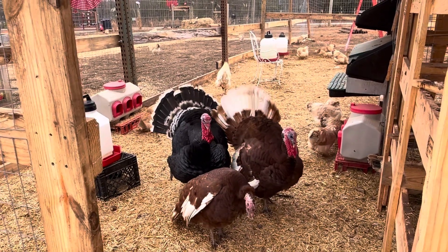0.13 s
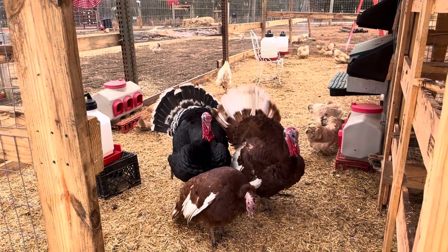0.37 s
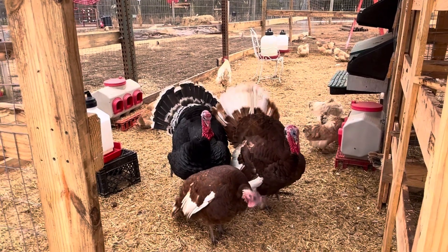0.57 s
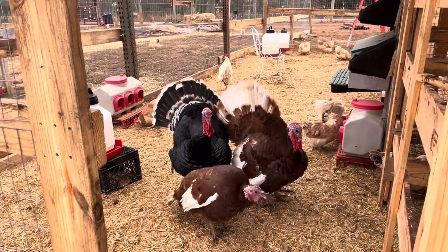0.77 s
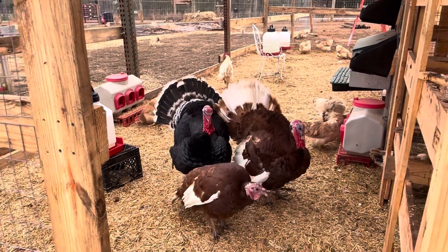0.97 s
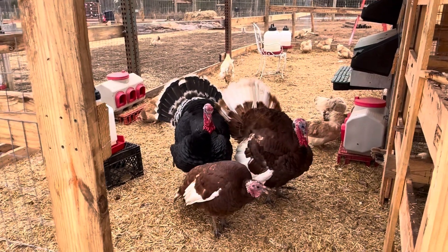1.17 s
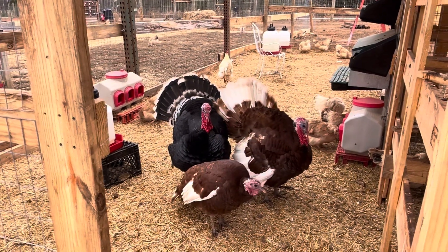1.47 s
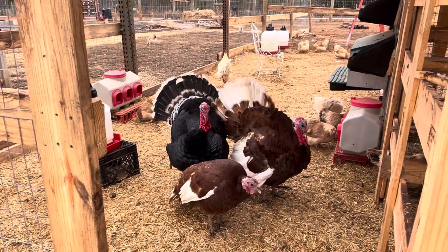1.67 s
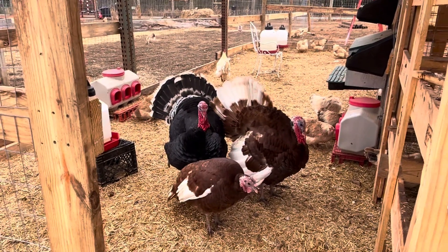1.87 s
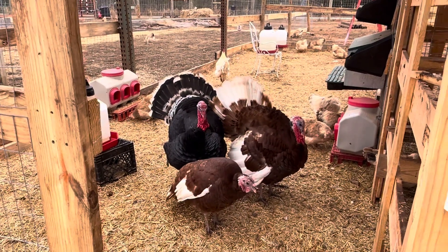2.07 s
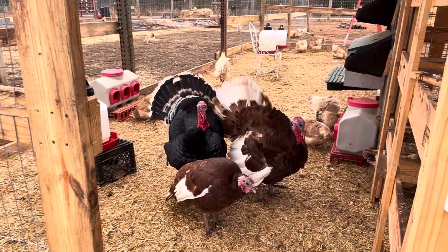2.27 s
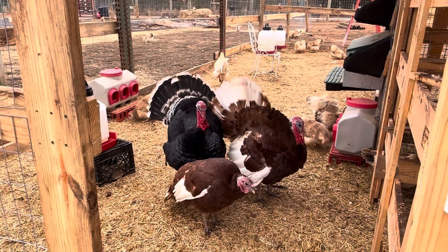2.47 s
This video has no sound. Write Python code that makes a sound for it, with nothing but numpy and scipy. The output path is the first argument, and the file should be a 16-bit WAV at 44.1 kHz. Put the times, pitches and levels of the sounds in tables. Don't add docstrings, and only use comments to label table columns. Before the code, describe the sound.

Turkeys shake their plumage a few metres away: muffled wing thuds, clacking quills and dry feather swishes build, peak near the middle, then ease as feet shuffle in litter; low wind rumble, outdoor pen, handheld stereo microphone.

```python
import sys
import numpy as np
from scipy import signal
from scipy.fft import rfft, irfft
from scipy.io import wavfile
from scipy.ndimage import uniform_filter1d

SR = 44100
rng = np.random.default_rng(int(sys.argv[2]) if len(sys.argv) > 2 else 0)


def store_pcm(level_fs):
    pcm = np.round(np.clip(level_fs, -1, 1) * 32767).astype(np.int16)
    wavfile.write(sys.argv[1], SR, np.atleast_2d(pcm).T)


def gain_from_db(level_db):
    decades = np.asarray(level_db, float) / 20
    return 10 ** decades


N = 115101

# start_s, level_db, upper_mode_share_0_1, ring_length_factor
WING_BEATS = [(0.107, -55.5, 0.8, 0.73), (0.27, -61, 0.4, 1.3), (0.321, -43.5, 0.1, 0.55),
              (0.565, -46.5, 0.34, 1), (0.644, -41, 0.39, 0.83), (0.699, -52, 0.54, 0.77),
              (0.776, -36.5, 0.47, 1), (0.862, -41, 0.1, 0.76), (0.869, -50.5, 1, 1.03),
              (0.943, -45, 0.4, 1.4), (0.957, -39.5, 0.63, 0.39), (0.987, -39, 0.3, 0.64),
              (1.054, -36, 0.13, 0.9), (1.167, -33.5, 0.59, 0.82), (1.279, -37, 0.03, 0.86),
              (1.344, -44.5, 1, 1.14), (1.385, -40.5, 0.34, 1.42), (1.487, -37, 0.37, 0.64),
              (1.598, -42.5, 0.85, 1.17), (1.708, -43.5, 0.49, 0.97), (1.775, -44, 0.3, 1),
              (1.808, -44, 0.97, 0.22), (2.027, -44.5, 0.4, 1.03), (2.129, -38, 0.53, 0.71),
              (2.298, -46, 0.3, 0.63), (2.335, -43, 0.38, 0.63), (2.405, -50.5, 0, 0.65)]
# pitch_hz, t60_s, level_db, upper_family_0_1
BODY_MODES = [(204, 0.064, -1, 0), (269.2, 0.047, 0.5, 0.25), (127.6, 0.2, -12, 0.4),
              (319.6, 0.064, 2.5, 1), (440, 0.037, -8.5, 0.85)]


def wing_beats():
    beat_db, after_db, wide_db, after_s = -2, -8, -26, 0.031
    t = np.arange(8192) / SR
    out = np.zeros((2, N + len(t)))
    for start_s, level_db, share, length in WING_BEATS:
        rag = rng.standard_normal((2, len(t))) * np.exp(-t / after_s) / np.sqrt(after_s * SR)
        push = rag * gain_from_db([[after_db], [wide_db]])
        push[0, 0] = 1
        body = 0
        for k, (hz, t60_s, mode_db, upper) in enumerate(BODY_MODES):
            u = t * np.log(1000) / (t60_s * max(length, 0.3))
            swell = np.e * u * np.exp(-u)
            weight = upper * share + (1 - upper) * (1 - share)
            sign = (-1) ** k
            body = body + sign * gain_from_db(mode_db) * weight * swell * np.sin(2 * np.pi * hz * t)
        i = int(start_s * SR)
        thud = signal.fftconvolve(push, body[None])[:, :len(t)]
        out[:, i:i + len(t)] += gain_from_db(level_db + beat_db) * thud
    return left_late(spread(out[0, :N], out[1, :N], -3.5))


# peak_s, level_db, length_s, brightness_db
KNOCKS = [(0.112, -66, 0.03, -17), (0.578, -56, 0.057, -15), (0.652, -60.5, 0.057, -9),
          (0.796, -64.5, 0.03, 3.5), (0.879, -53, 0.071, -20), (1.016, -53, 0.055, -12.5),
          (1.081, -53.5, 0.029, -26), (1.182, -52, 0.058, -29), (1.353, -60, 0.13, -7.5),
          (1.491, -55, 0.021, -13), (1.566, -54.5, 0.019, -51), (1.79, -59.5, 0.15, -3),
          (1.91, -61.5, 0.16, -3.5), (2.024, -53.5, 0.033, -16), (2.11, -58, 0.083, -34),
          (2.168, -56, 0.067, -16), (2.278, -62, 0.026, -11), (2.386, -62, 0.2, -19),
          (2.474, -60, 0.058, -27), (2.6, -57, 0.029, -22)]
# pitch_hz, width_hz, level_db
QUILL_MODES = [(620, 270, 2.5), (922, 130, -3.5), (1120, 120, -9)]


def quill_knocks():
    k = np.array(KNOCKS)
    low_level = swells(KNOCKS, k[:, 1] - 6, 0.53)
    top_level = swells(KNOCKS, k[:, 1] + k[:, 3] - 3, 0.73)

    def clatter():
        x = rng.standard_normal(N)
        low = sum(gain_from_db(db) * np.sqrt(width) * ring(x, hz, 2.2 / width) for hz, width, db in QUILL_MODES)
        top = ring(x, 1560, 0.001)
        return low_level * low / low.std() + top_level * top / top.std()

    return spread(clatter(), clatter() * gain_from_db(0.5), -4.0)


# peak_s, level_db, pitch_hz, length_s
TWANGS = [(0.115, -60, 600, 0.018), (2.135, -46, 260, 0.018), (0.555, -63.5, 920, 0.043),
          (0.795, -63, 1690, 0.022), (0.866, -62.5, 954, 0.034), (0.87, -70, 1180, 0.023),
          (0.884, -58, 770, 0.035), (0.978, -59, 878, 0.012), (1.01, -59, 620, 0.016),
          (1.162, -56, 937, 0.017), (1.178, -63, 1450, 0.024), (1.186, -63, 950, 0.013),
          (1.205, -57, 602, 0.025), (1.232, -62.5, 1194, .013), (1.345, -56.5, 1188, 0.018),
          (1.346, -56, 870, .02), (1.356, -58, 1004, 0.04), (1.378, -52, 339.3, 0.037),
          (1.394, -62, 920, .025), (1.412, -46.5, 135, 0.056), (1.425, -61, 1000, 0.036),
          (1.471, -49.5, 315.4, 0.036), (1.476, -62, 880, 0.02), (1.565, -55.5, 1220, 0.017),
          (1.566, -58, 939, 0.022), (1.632, -50.5, 200, 0.026), (1.737, -63, 1270, .02),
          (1.801, -58, 912, 0.029), (1.808, -50.5, 460, 0.017), (1.835, -63, 829, 0.019),
          (1.884, -70, 2150, 0.057), (2.025, -61, 1236, .02), (2.084, -57, 1007, 0.029),
          (2.132, -59, 1093, 0.019), (2.179, -60, 950, 0.045), (2.18, -59, 2500, .007),
          (2.185, -56.5, 3400, .013), (2.183, -57, 1890, 0.016), (2.19, -63, 5370, 0.01),
          (2.215, -62, 3400, 0.016), (2.222, -65, 4480, 0.0072), (2.182, -60, 3930, .005),
          (2.184, -60, 6800, .0012), (0.498, -60, 11000, .0008), (1.742, -44.5, 100, .04),
          (2.038, -44, 99.7, 0.026), (2.268, -47.5, 69.9, .05), (1.236, -57, 190, 0.036),
          (1.453, -55, 453.6, 0.018), (0.465, -59.5, 299.4, 0.051)]


def short_twangs():
    t, out = np.arange(N) / SR, 0
    waver_s = t + np.cumsum(0.0118 * walk(90.0)) / SR
    for peak_s, level_db, hz, length_s in TWANGS:
        bell = np.exp(-4 * ((t - peak_s) / length_s) ** 2)
        out = out + gain_from_db(level_db) * bell * np.sin(2 * np.pi * (hz * waver_s + rng.random()))
    return left_late(spread(out, 0, -3.5))


# peak_s, level_db, length_s, brightness_db
SWISHES = [(0.01, -70, 0.018, -20), (0.131, -57, 0.029, -6.5), (0.332, -62.5, 0.054, -8),
           (0.435, -70, 0.018, -3), (0.51, -62.5, 0.082, -12), (0.796, -51.5, 0.037, -15),
           (0.975, -53.5, 0.038, -6.5), (1.087, -53.5, 0.032, -12), (1.297, -53, 0.059, -12),
           (1.43, -51, 0.051, -18), (1.508, -60.5, 0.026, -15), (1.633, -52, 0.037, -11),
           (1.724, -58.5, 0.054, -14.5), (1.804, -60, 0.048, -12.5), (1.937, -58, 0.061, -16),
           (2.045, -62, 0.027, -13), (2.18, -58, 0.18, -26), (2.285, -57.5, 0.031, -12),
           (2.398, -59.5, 0.059, -26), (2.534, -79.5, 0.067, 8),
           (0.084, -78, 0.028, 9),
    (0.67, -59.5, 0.11, -16),
    (0.724, -64.5, 0.077, -6.5),
    (1.175, -63, 0.063, -14),
    (1.405, -64, .03, -5),
    (2.153, -57.5, 0.036, -11),
]
# time_s, level_db, brightness_db
RUSTLE = [
    (0.0, -86, -14),
    (0.25, -77, -10),
    (1.21, -69.5, -10),
    (2.61, -81, -3),
]
# freq_hz, level_db_per_hz
VANES_MID = [(900, -3), (1800, -5.5), (2900, -3.5), (3400, -1.5), (4200, -4.5), (5200, -2), (7000, -6)]
# freq_hz, level_db_per_hz
VANES_SIDE = [(900, 19), (1800, 9), (2800, 10), (4300, 6.5), (5600, 12), (7000, 5)]
# freq_hz, level_db_per_hz
VANES_TOP = [(6000, -27.5), (8000, -6.5), (11000, -4.5), (14000, -2.5), (16000, -10)]


def feather_swishes():
    s = np.array(SWISHES)
    flicker = gain_from_db(1.5 * walk(31.64))
    rustle_db, rustle_bright_db = curve(RUSTLE), curve(RUSTLE, 2)
    tail = 1.45
    low_level = np.hypot(swells(s, s[:, 1] - 12.5, tail), gain_from_db(rustle_db))
    top_level = np.hypot(swells(s, s[:, 1] + s[:, 3] - 5.5, tail), gain_from_db(rustle_db + rustle_bright_db))

    def swish(shape):
        x = crackle()
        return flicker * (low_level * colour(x, shape) + top_level * colour(x, VANES_TOP))

    return spread(swish(VANES_MID), gain_from_db(1.0) * swish(VANES_SIDE), 0.23)


# start_s, level_db, rattle_s, centre_hz, spread_octaves
PECKS = [
    (0.113, -55, 0.033, 3740, 0.22),
    (0.88, -66, 0.008, 3420, .08),
    (1.632, -64, 0.004, 4200, 0.3),
    (2.179, -54.5, 0.0023, 3070, 0.47),
    (2.182, -54, 0.015, 5260, 0.64),
    (2.212, -55, 0.0067, 3780, 0.25),
    (2.383, -62, 0.0025, 5760, 0.76),
    (2.523, -66.5, 0.0045, 6000, .3),
]
# pitch_hz, level_db
PECKED_MODES = [(1900, -2), (2500, -3), (3050, -3), (3390, 0), (3940, -3), (4500, -5), (5370, -3),
                (5890, -6), (6340, -7)]


def pecks():
    strike_s, mode_t60_s, off_centre_db, crack_db = 0.002, 0.038, 6, 14
    t = np.arange(6000) / SR
    out = np.zeros((2, N + len(t)))
    for start_s, level_db, rattle_s, centre_hz, octaves in PECKS:
        envelope = np.sqrt(3 * t / rattle_s) * np.exp(-t / rattle_s) / np.sqrt(rattle_s * SR)
        x = rng.standard_normal((2, len(t))) * envelope
        x[[0, 1], [0, 4]] = min(strike_s / rattle_s, 1)
        y = gain_from_db(level_db + crack_db) * np.sqrt(octaves) * ring(x, centre_hz, 3 / (octaves * centre_hz))
        for hz, mode_db in PECKED_MODES:
            loss_db = off_centre_db * (np.log2(hz / centre_hz) / octaves) ** 2
            y = y + gain_from_db(level_db + mode_db - loss_db) * ring(x, hz, mode_t60_s)
        i = int(start_s * SR)
        out[:, i:i + len(t)] += y
    return out[:, :N] * gain_from_db([[1.5], [-1.5]])


# time_s, level_db
LITTER = [
    (0.0, -73),
    (1.92, -60),
    (2.15, -60.5),
    (2.3, -66),
    (2.61, -66),
]
# freq_hz, level_db_per_hz
LITTER_COLOUR = [(150, 3.5), (330, 1.5), (500, -6), (900, -14.5), (2000, -16), (2700, -33.5)]


def litter():
    level = gain_from_db(curve(LITTER) + 3 + 1.5 * walk(9.9))
    mid = level * colour(crackle(), LITTER_COLOUR)
    side = level * gain_from_db(-2) * colour(crackle(), LITTER_COLOUR)
    return spread(mid, side, -0.35)


# freq_hz, level_db_per_hz
YARD_MID = [(30, -5), (60, 5), (104, 4.5), (295, -14.5), (744, -45), (1670, -25.5), (2300, -38),
            (2900, -75)]
# freq_hz, level_db_per_hz
YARD_SIDE = [(30, -4.5), (112, 10), (263, -6), (551, -17), (1600, -16.5), (2360, -21.5), (5820, -26.5)]


def yard():
    def air(shape, level_db):
        gust_db = 0.7 * walk(3.0)
        return gain_from_db(level_db + gust_db) * colour(patchy(rng.standard_normal(N)), shape)

    return left_late(spread(air(YARD_MID, -51.5), air(YARD_SIDE, -65), -1.5))


def crackle():
    hit = rng.random(N) < 3000 / SR
    clicks = hit * rng.standard_normal(N) * gain_from_db(1.7 * rng.exponential(size=N))
    return patchy(clicks + 0.49 * rng.standard_normal(N))


def patchy(x):
    z = signal.stft(x, nperseg=512)[2]
    spots = uniform_filter1d(rng.standard_normal(z.shape), size=3, axis=1) * np.sqrt(3)
    spots = spots * np.clip(np.arange(len(z)) / 8, 0, 1)[:, None]
    return signal.istft(z * gain_from_db(4.5 * spots), nperseg=512)[1][:N]


def colour(x, points):
    p = np.array(points, float)
    f = np.log(np.maximum(np.fft.rfftfreq(N, 1 / SR), 1))
    lf = np.log(p[:, 0])
    outside = np.maximum(lf[0] - f, 0) + np.maximum(f - lf[-1], 0)
    db = np.interp(f, lf, p[:, 1]) - 30 * outside
    y = irfft(rfft(x) * gain_from_db(db), N)
    return y / np.sqrt(np.mean(y ** 2))


def ring(x, hz, t60_s):
    pole = np.exp(2j * np.pi * hz / SR - np.log(1000) / (max(t60_s, 0.002) * SR))
    return signal.lfilter([1], [1, -pole], x).imag


def walk(rate_hz):
    k = int(SR / rate_hz)
    steps = np.repeat(rng.standard_normal(N // k + 1), k)
    return uniform_filter1d(uniform_filter1d(steps, k), k)[:N]


def swells(rows, level_db, tail):
    t, power = np.arange(N) / SR, 1e-18
    for (peak_s, _, length_s, _), db in zip(rows, level_db):
        width_s = length_s * np.where(t > peak_s, tail, 1)
        power = power + gain_from_db(2 * db) * np.exp(-4 * ((t - peak_s) / width_s) ** 2)
    return np.sqrt(power)


def curve(rows, column=1):
    return np.interp(np.arange(N) / SR, [r[0] for r in rows], [r[column] for r in rows])


def spread(mid, side, pan_db=0):
    return (mid + side * np.array([[1], [-1]])) * gain_from_db(np.array([[pan_db], [-pan_db]]) / 2)


def left_late(both):
    return np.array([np.roll(both[0], 10), both[1]])


def scene():
    shaking = wing_beats() + quill_knocks() + short_twangs() + feather_swishes()
    return shaking + pecks() + litter() + yard()


def band_limit(x):
    return signal.sosfilt(signal.butter(12, 15700, fs=SR, output="sos"), x)


def record(dry):
    f = np.fft.rfftfreq(N, 1 / SR)

    def dip(x, hz, width_hz, depth_db):
        return irfft(rfft(x) * gain_from_db(depth_db * np.exp(-((f - hz) / width_hz) ** 4)), N)

    dry = signal.sosfilt(signal.butter(2, 45, "high", fs=SR, output="sos"), dry)
    mid = dip(dry.mean(axis=0), 8300, 960, -21)
    mid = dip(mid, 15800, 1680, -22)
    side = dip((dry[0] - dry[1]) / 2, 12150, 1350, -26)
    side = dip(side, 14800, 1100, -2.5)
    return band_limit(spread(mid, side))


dry = scene()
out = record(dry)
store_pcm(out)
```